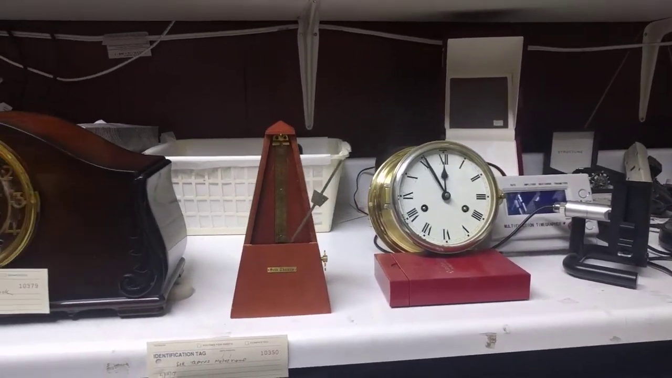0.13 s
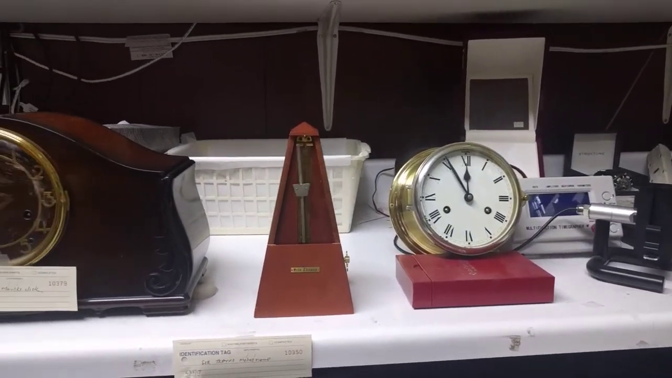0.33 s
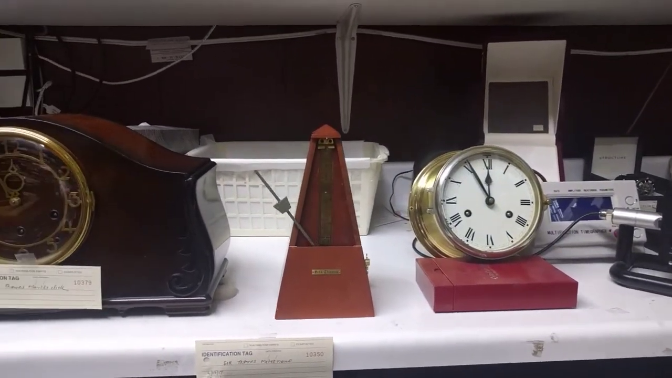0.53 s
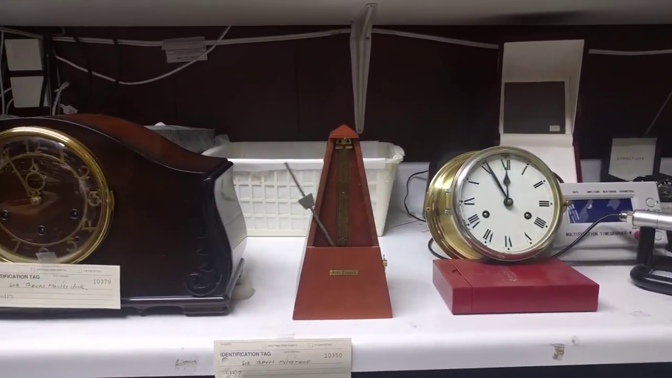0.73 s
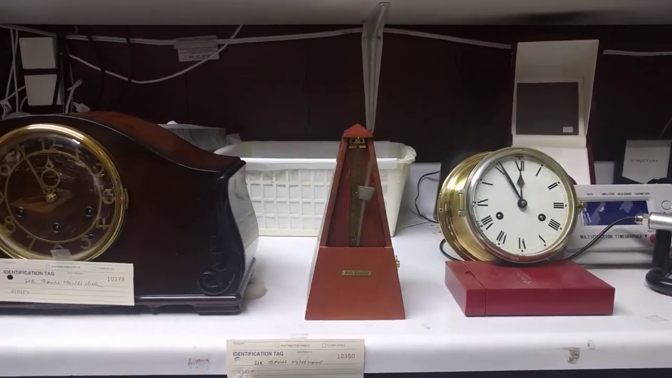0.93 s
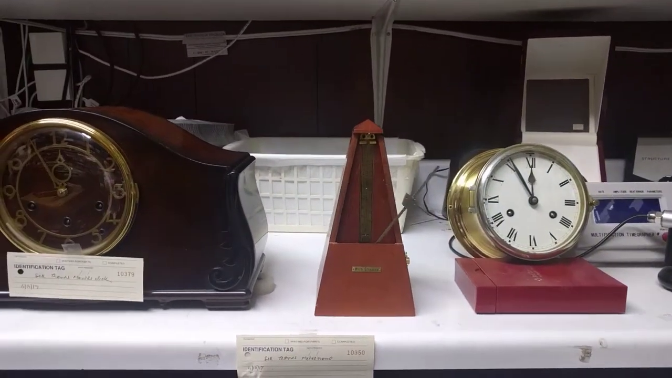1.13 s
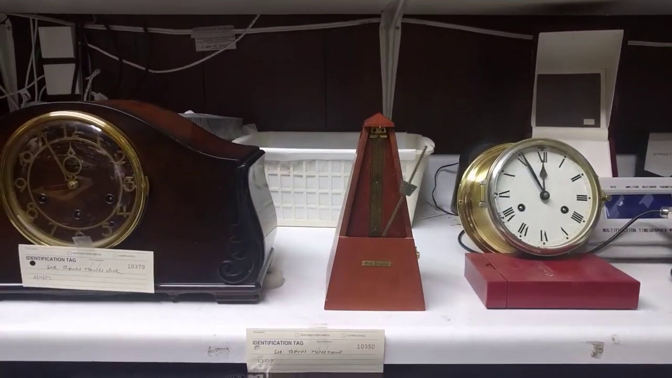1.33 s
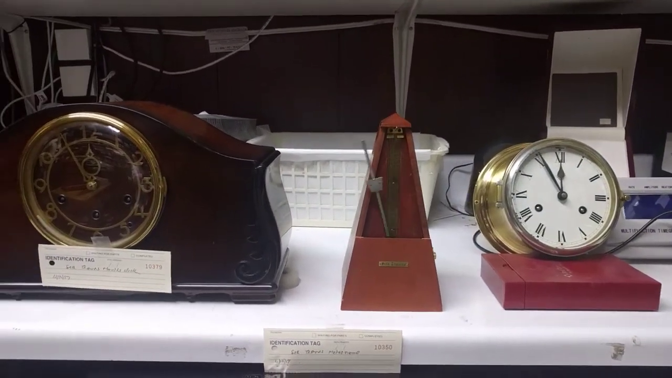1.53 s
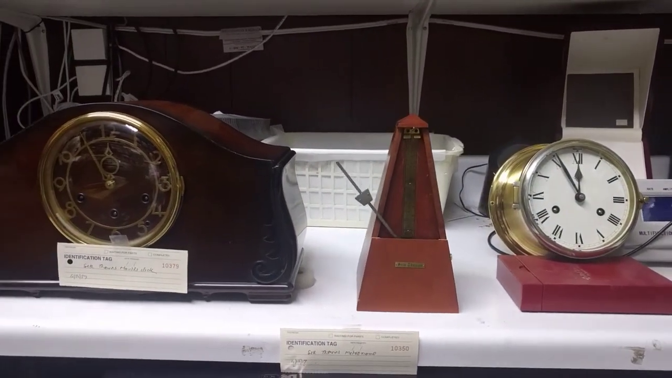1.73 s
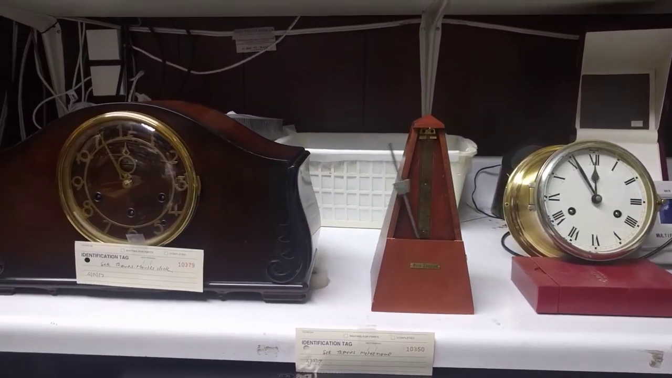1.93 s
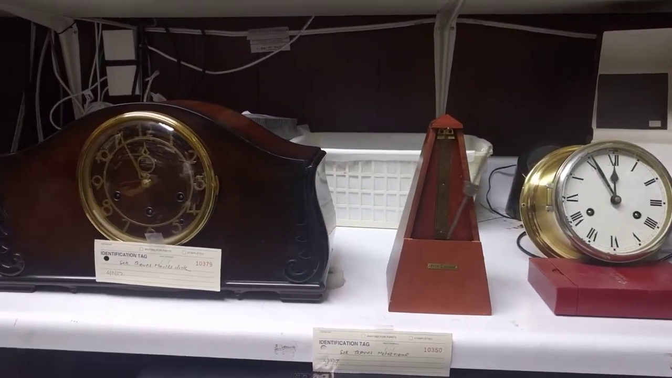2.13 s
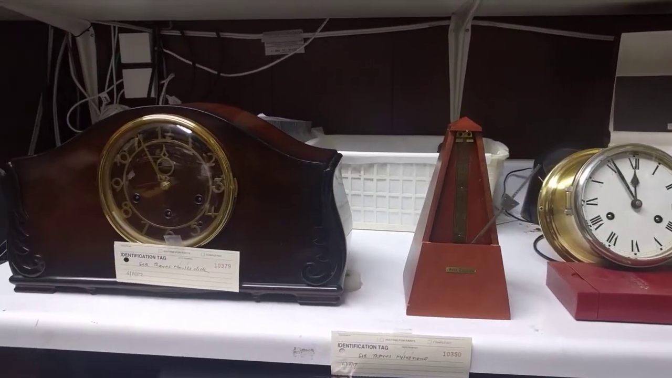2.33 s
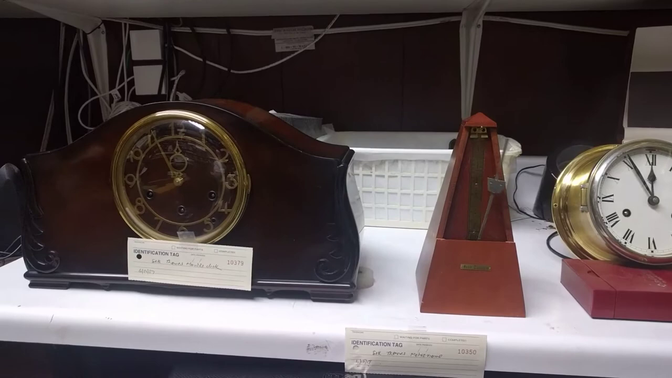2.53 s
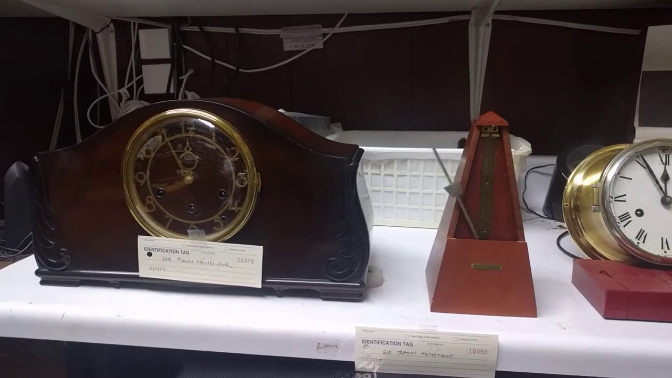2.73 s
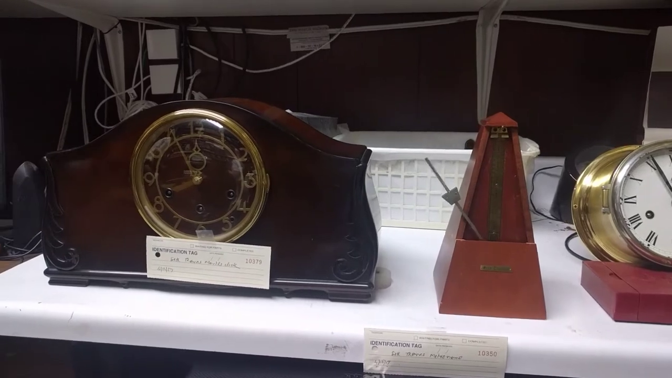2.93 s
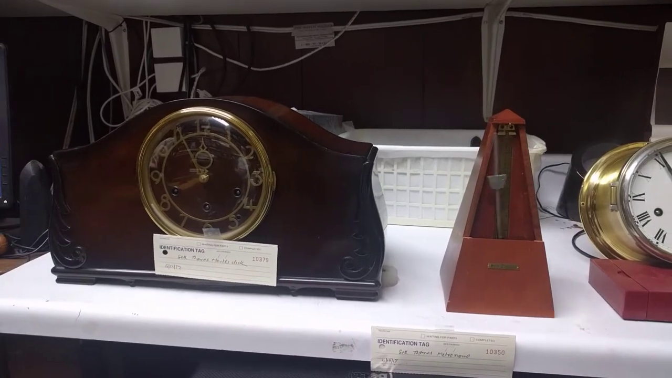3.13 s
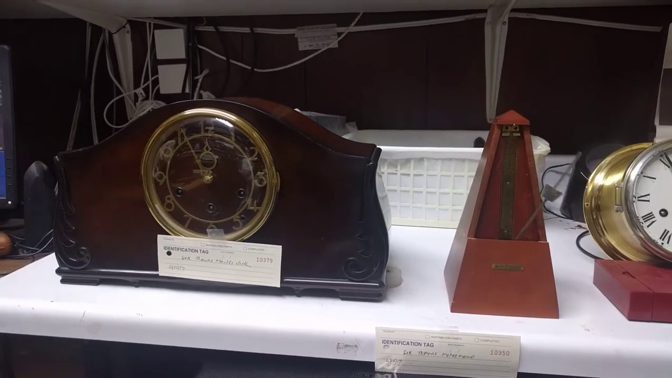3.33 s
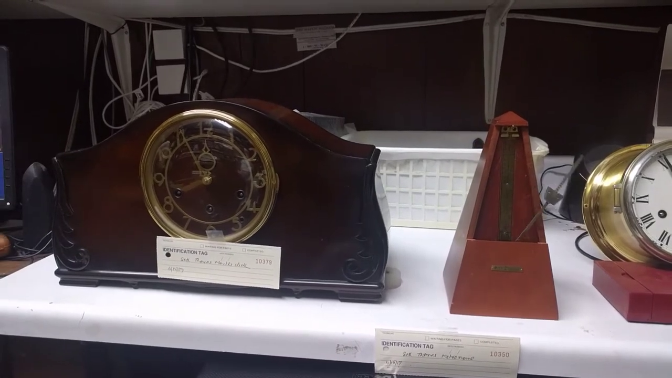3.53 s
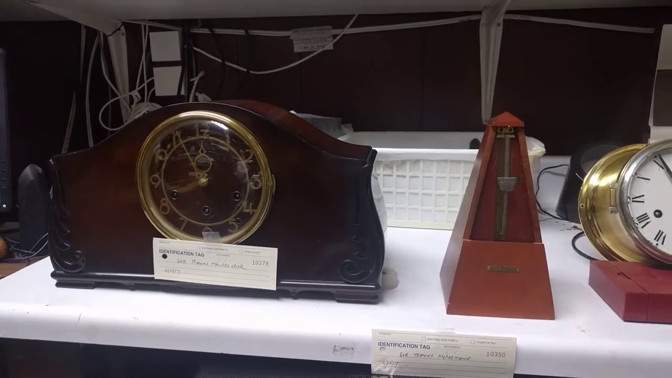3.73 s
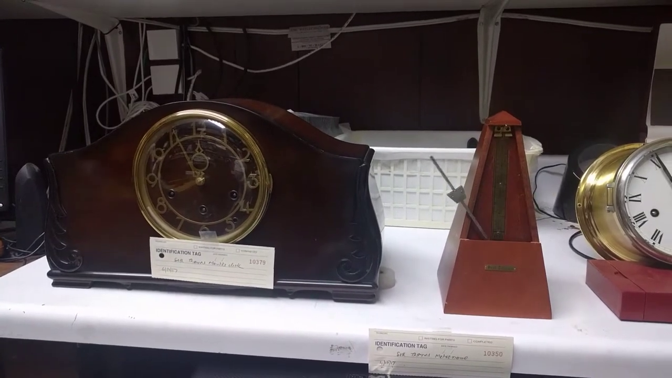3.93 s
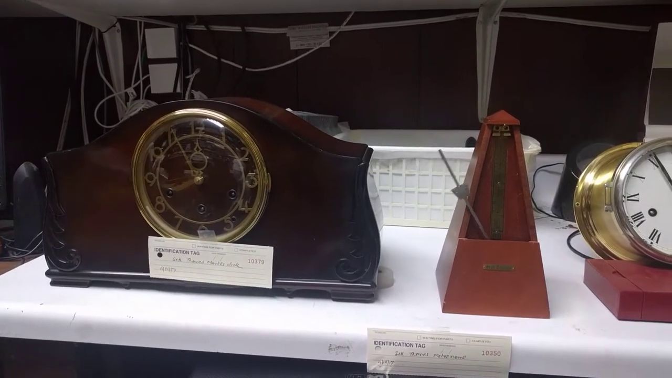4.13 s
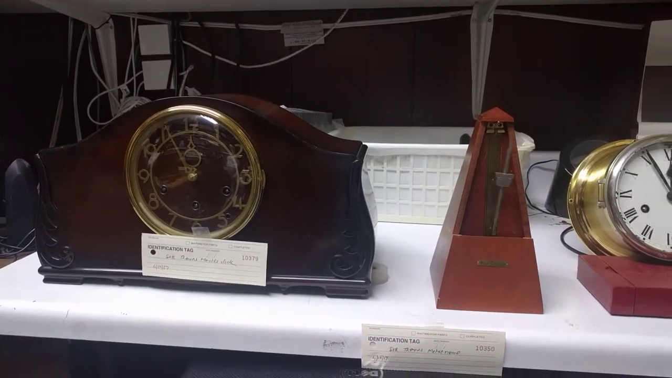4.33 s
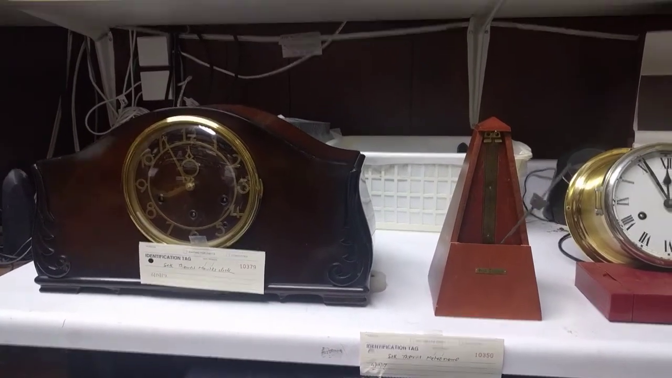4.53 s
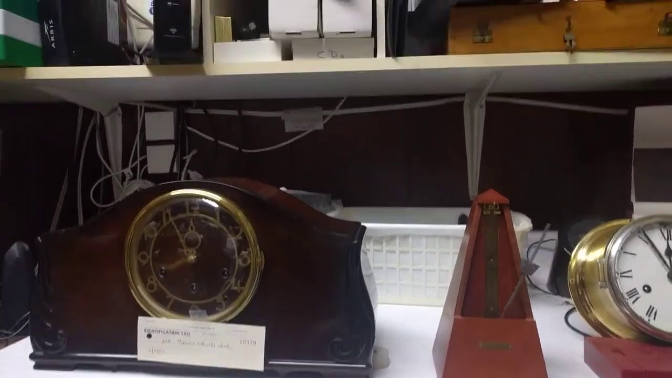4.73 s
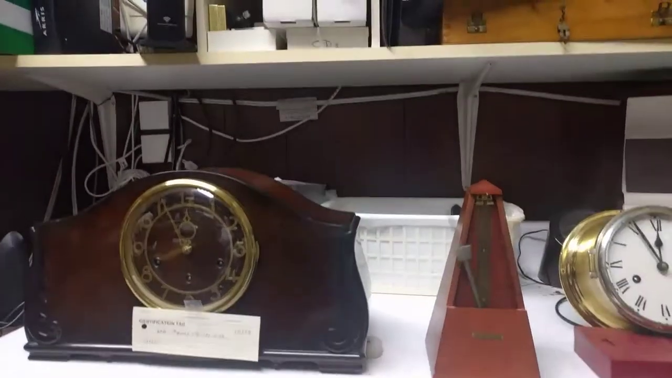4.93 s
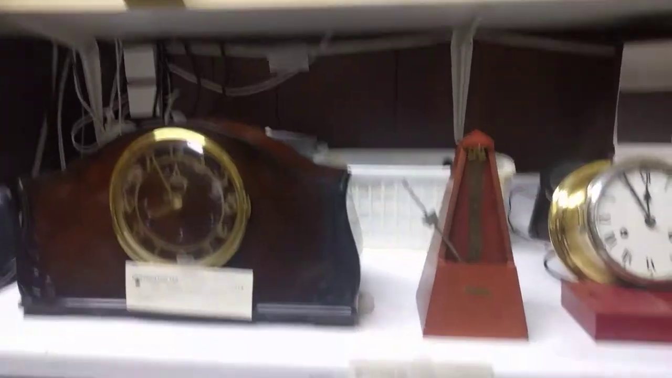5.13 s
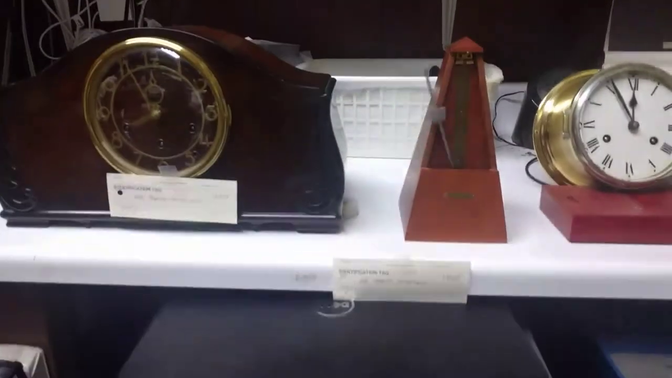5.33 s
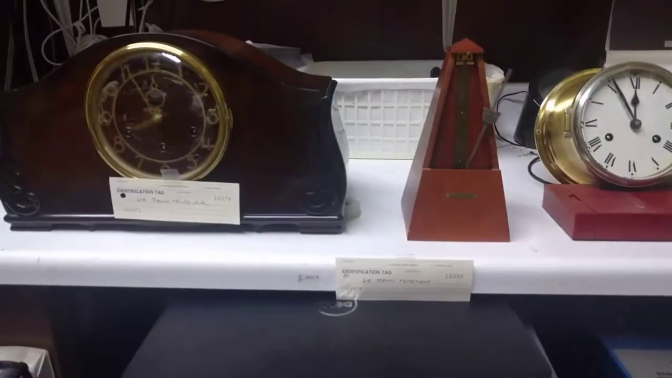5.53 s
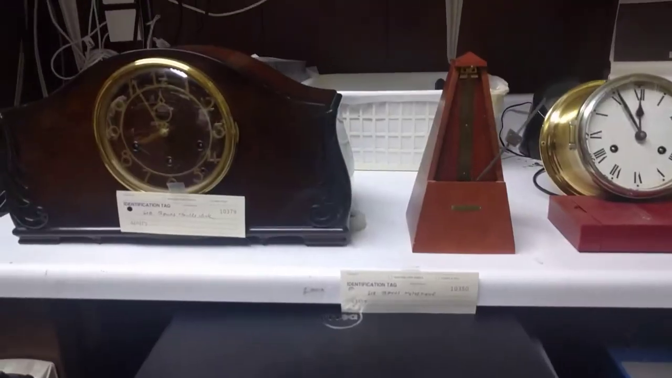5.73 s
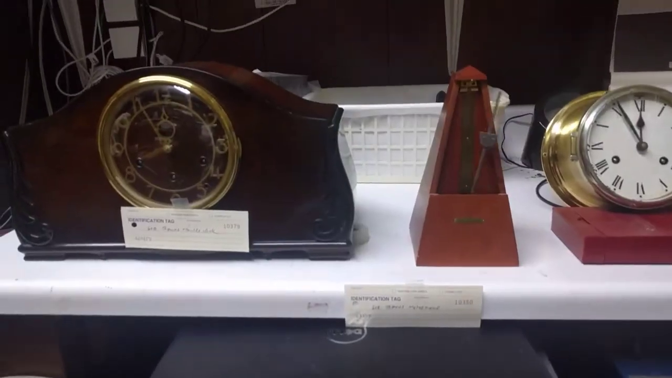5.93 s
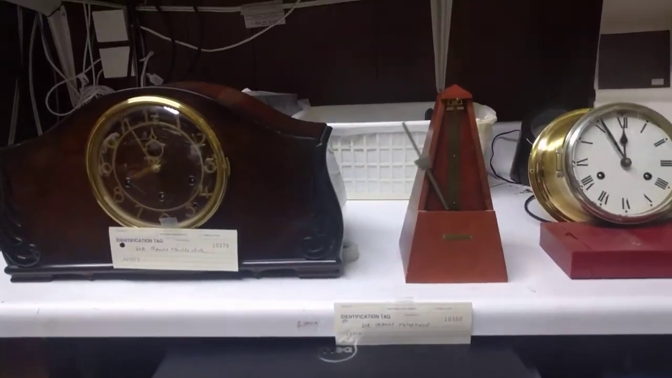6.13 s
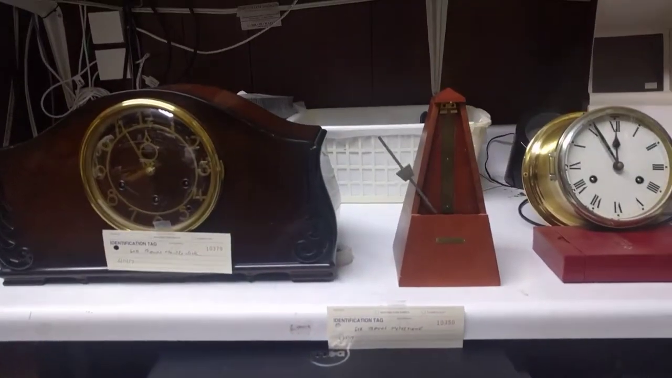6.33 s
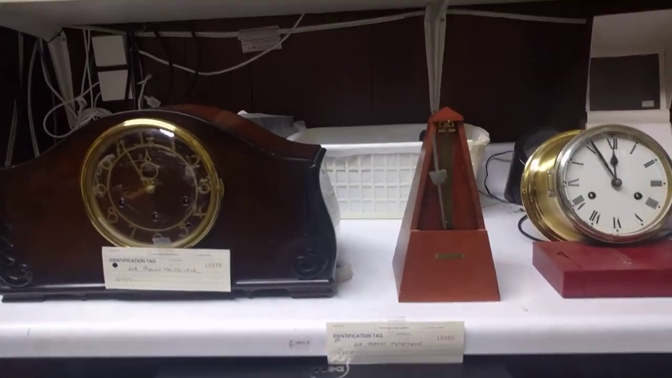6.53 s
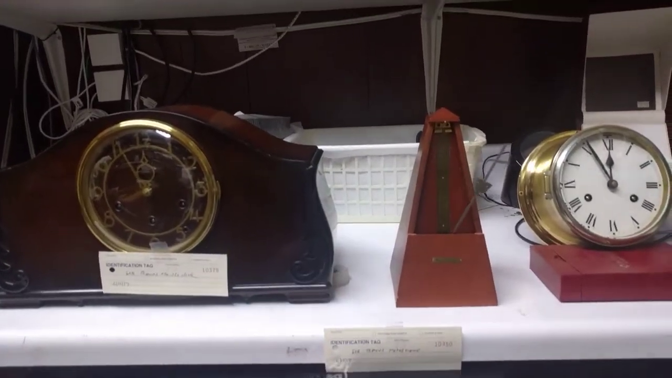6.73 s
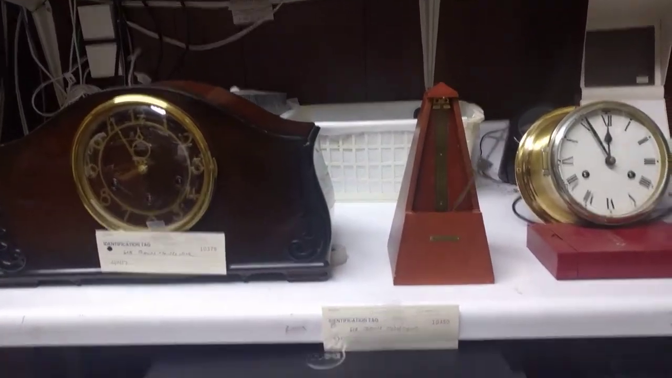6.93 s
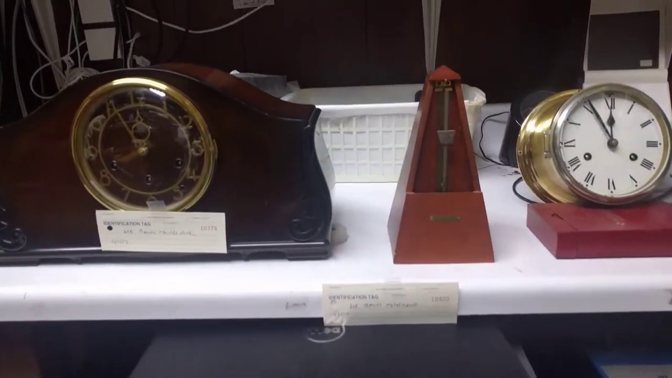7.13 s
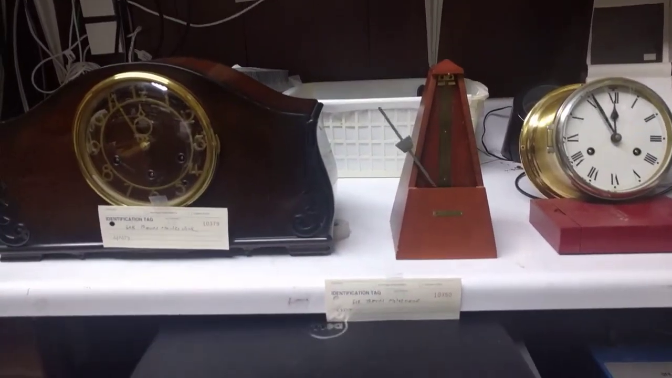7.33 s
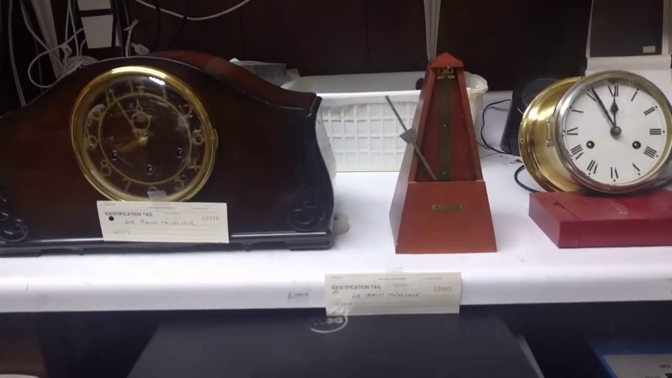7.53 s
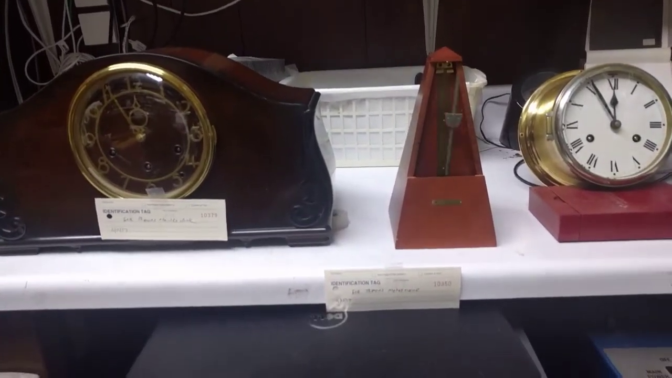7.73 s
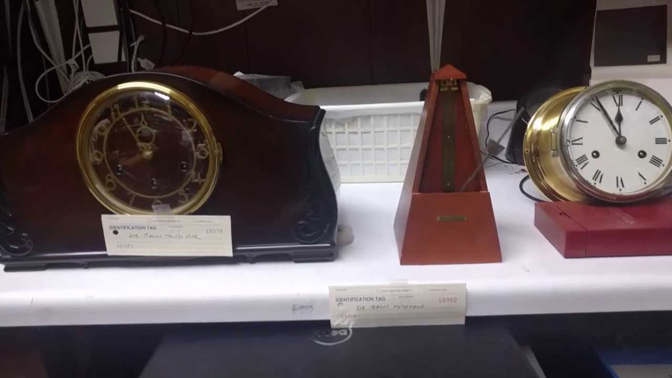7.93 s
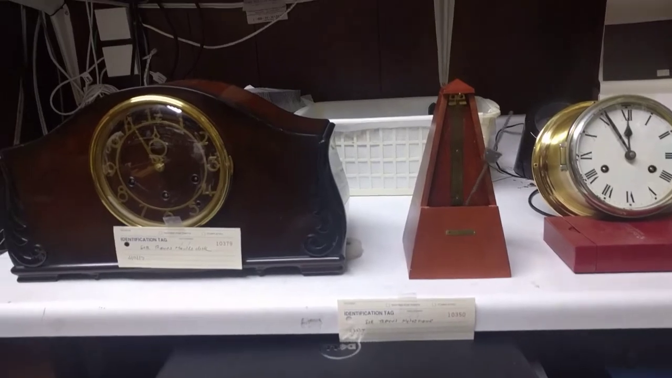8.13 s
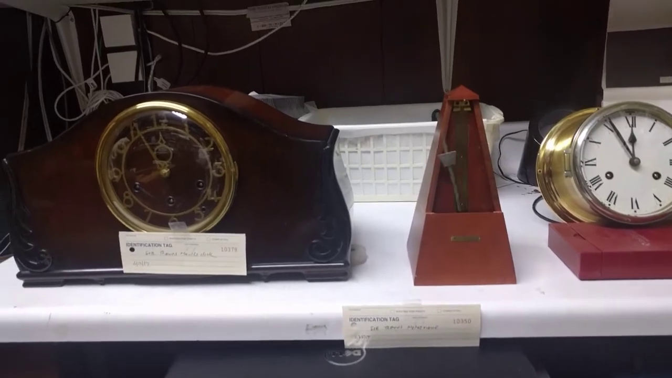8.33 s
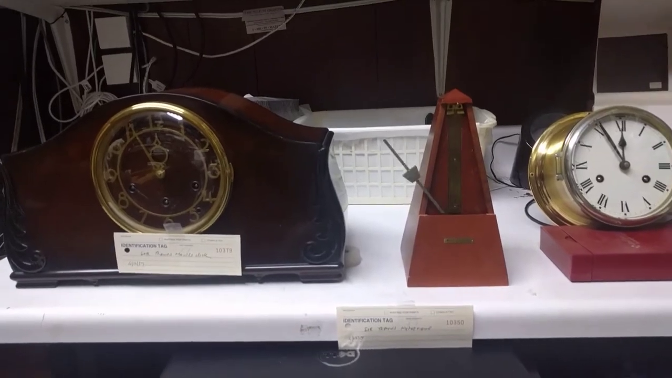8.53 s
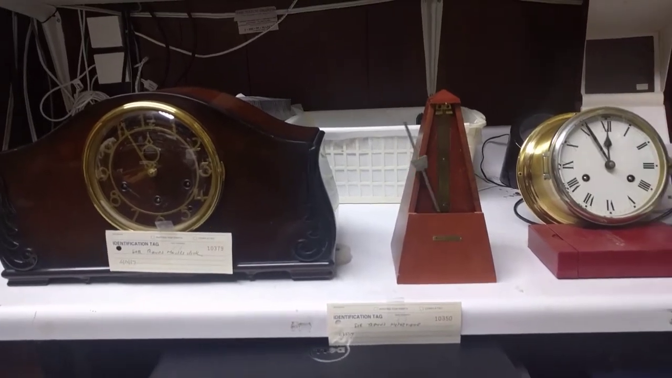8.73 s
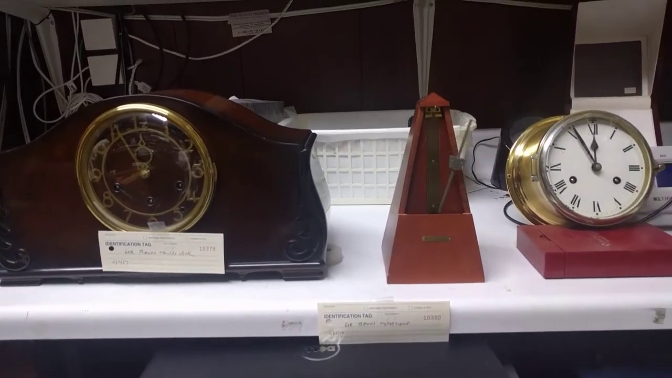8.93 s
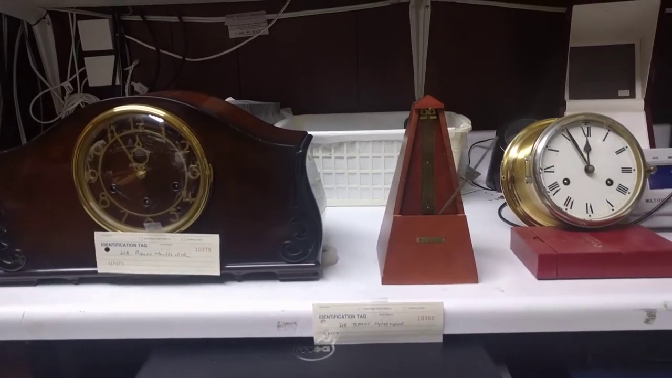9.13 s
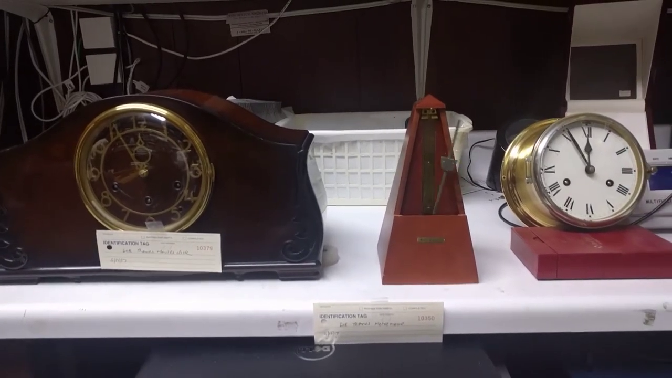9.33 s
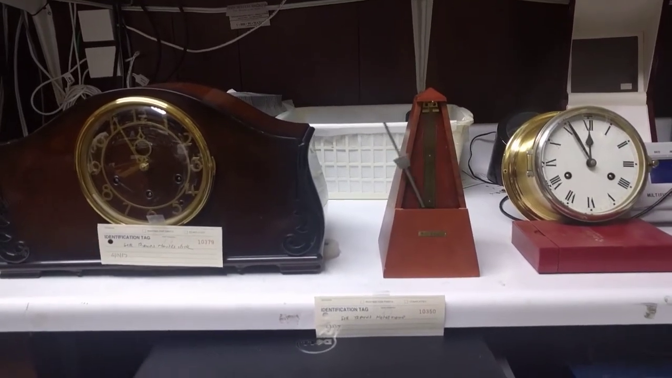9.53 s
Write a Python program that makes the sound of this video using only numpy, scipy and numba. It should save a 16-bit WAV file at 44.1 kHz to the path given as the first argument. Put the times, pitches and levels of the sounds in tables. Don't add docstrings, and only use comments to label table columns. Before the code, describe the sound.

A mechanical metronome in a hollow wooden case beats steadily, nearly twice a second, alternating a crisp bright tick with a slightly different tock. Each beat rings briefly and bounces off the shelf into a small room. A faint low fan hum and soft hiss lie behind. Midway, fingers knock and rub the close hand-held phone microphone, then lighter rustles follow.

```python
import sys
import numpy as np
from scipy import signal
from scipy.fft import rfft, irfft
from scipy.io import wavfile
from scipy.ndimage import uniform_filter1d
from numba import njit

SR = 44100
rng = np.random.default_rng(int(sys.argv[2]) if len(sys.argv) > 2 else 0)


def attenuation_scalar(level_db):
    decades = np.asarray(level_db, float) / 20
    return 10 ** decades


def wav_record(signal):
    frames = np.transpose(np.atleast_2d(signal))
    bounded = np.clip(frames, -1, 1)
    quanta = np.round(bounded * 32767).astype(np.int16)
    wavfile.write(sys.argv[1], SR, quanta)


N = 427329
T = np.arange(N) / SR


def unit(x):
    return x / np.sqrt(np.mean(x ** 2))


def colour(x, points):
    hz, db = np.transpose(points)
    f = np.maximum(np.arange(len(x) // 2 + 1) * SR / len(x), 1)
    gain = attenuation_scalar(np.interp(np.log(f), np.log(hz), db))
    return irfft(rfft(x) * gain, len(x))


@njit
def band(x, hz, width):
    y, b, l = np.empty(len(x)), 0., 0.
    for i in range(len(x)):
        g, k = np.tan(np.pi * hz[i] / SR), width / hz[i]
        v = (b + g * (x[i] - l)) / (1 + g * (g + k))
        b, l, y[i] = 2 * v - b, l + 2 * g * v, k * v
    return y


def ring(x, hz, width):
    return band(x, np.full(len(x), 1. * hz), 1. * width)


@njit
def follow(x, attack, release):
    y, e = np.empty(len(x)), 0.
    for i in range(len(x)):
        e += (abs(x[i]) - e) * (attack if abs(x[i]) > e else release)
        y[i] = e
    return y


def walk(rate):
    hold = int(SR / rate)
    steps = np.repeat(rng.standard_normal(N // hold + 1), hold)
    return uniform_filter1d(uniform_filter1d(steps, hold), hold)[:N]


def strokes(rows, extra_db):
    pointedness = 1.46
    power = np.zeros(N)
    for (s, rise, fall, db, _), more_db in zip(rows, extra_db):
        part = slice(int((s - rise) * SR), int((s + fall) * SR))
        away = (T[part] - s) / np.where(T[part] < s, rise, fall)
        arch = np.maximum(1 - away ** 2, 0) ** pointedness
        power[part] += (attenuation_scalar(db + more_db) * arch) ** 2
    return np.sqrt(power)


# start in seconds, peak level in dB.
BLOWS = [(.4283, -7.5), (1.0187, -5.5), (1.5663, -7), (2.1557, -6.5), (2.7007, -6), (3.2926, -5),
         (3.8376, -6), (4.4268, -6.5), (4.974, -5.5), (5.564, -5), (6.1077, -5.5), (6.6979, -6),
         (7.2445, -5), (7.8363, -5.5), (8.3792, -4.5), (8.9726, -5), (9.5182, -6)]
# pitch in Hz, time to fade by 60 dB in seconds,
# level in a tick in dB, level in a tock in dB.
CASE_MODES = [(516, 0.088, -12, -10.5), (652, 0.045, -3.5, -5.5), (780, 0.048, -3.5, -5.5),
              (745, 0.054, -20, -17), (816, 0.059, -45, -20), (1460, 0.023, -24, -18),
              (2010, 0.014, -24.5, -26), (2777, 0.029, -6.5, -15), (3410, 0.018, -1.5, -7),
              (3790, 0.016, -9, -21), (3660, 0.023, -16, -11.5), (4500, 0.072, -3.5, -10.5),
               (4936, 0.054, 2, -6), (5400, 0.004, 2, 4.5), (5757, 0.024, -0.5, 1.5),
              (6150, 0.0053, 3, 2.5), (6850, 0.04, -6.5, -2), (7180, 0.032, 1.5, -8),
              (7310, 0.013, -19, 1.5), (8050, 0.032, -3, -1), (8470, 0.011, -3.5, -1.5),
              (8900, 0.045, -11, -6), (9810, 0.03, -5, -5.5), (11100, .012, -9, -9),
              (11980, 0.015, -9, -5.5), (14000, .006, -44, -29)]
# delay in seconds, level in dB, signed strength (minus flips the wave).
ECHOES = [
    (.00042, -1, -5),
    (.00105, 6.5, 1.5),
    (.0021, -7, 1.5),
    (.0046, -32, -9),
    (.0093, -15, 2),
]
# frequency in Hz, level in dB per Hz.
TICK_ROOM = [(530, -18), (900, -5), (1730, -14.5), (1920, -10.5), (2840, -6), (4100, -2.5), (4490, 5.5),
             (5650, 0.5), (8540, -0.5), (14000, -46)]
# frequency in Hz, level in dB per Hz.
TOCK_ROOM = [(530, -18), (900, 1), (1130, -15.5), (1460, -5.5), (1640, -12), (3700, -4.5), (6410, 1),
             (8740, 0.5), (9580, -10), (14000, -51)]
# pitch in Hz, width in Hz, tick level in dB, tock level in dB.
PANELS = [
    (780, 89, -13, -21),
    (5600, 270, -7, -4.5),
    (2750, 390, -13.5, -23),
    (3350, 170, -15.5, -36),
    (4800, 150, -9.5, -8),
]


def metronome():
    out, t = np.zeros(N + SR), T[:SR // 3]
    hz, t60, *face_db = np.transpose(CASE_MODES)
    sign = (-1.) ** np.arange(len(hz))
    hollow = hz < 1100
    hollow_db = 1.5

    wall_hz, wall_s, wall_rise_s, wall_fall_s, wall_db = 773, 0.033, 0.0075, 0.0094, -33.5
    swell = np.exp(-((t - wall_s) / np.where(t < wall_s, wall_rise_s, wall_fall_s)) ** 2)
    wall = attenuation_scalar(wall_db) * swell * np.sin(2 * np.pi * wall_hz * t)

    room_db, room_t60_s, room_rise_s, room_end_s = -19, 0.16, 0.00027, 0.27
    chance = rng.standard_normal((len(BLOWS), 2, len(hz)))
    for k, (s, db) in enumerate(BLOWS):
        face = k % 2
        size = sign * attenuation_scalar(face_db[face] + 1.2 * chance[k, 0])
        pitch = hz * (1 + 0.0026 * chance[k, 1])
        fade = np.exp(-np.log(1000) * t / t60[:, None])
        modes = fade * np.sin(2 * np.pi * pitch[:, None] * t)

        case = (size * ~hollow) @ modes
        near = case.copy()
        for late, echo_db, turn in ECHOES:
            near += turn * attenuation_scalar(echo_db) * np.interp(t - late, t, case, left=0)
        near += (attenuation_scalar(face_db[face] + hollow_db) * hollow) @ modes
        near = np.convolve(near, np.hanning(6), "same")
        near /= near[:SR // 50].std()

        room = unit(colour(rng.standard_normal(len(t)), (TICK_ROOM, TOCK_ROOM)[face]))
        for panel_hz, width, *panel_db in PANELS:
            room += attenuation_scalar(panel_db[face]) * unit(ring(rng.standard_normal(len(t)), panel_hz, width))
        room /= np.sqrt(1 + (t / room_end_s) ** 6)
        room *= (1 - np.exp(-t / room_rise_s)) * np.exp(-np.log(1000) * t / room_t60_s)

        i = int(s * SR)
        out[i:i + len(t)] += attenuation_scalar(db + 4.0) * (attenuation_scalar(-14.5) * near + attenuation_scalar(room_db) * room + wall)
    return signal.sosfilt(signal.butter(4, 420, "high", fs=SR, output="sos"), out[:N])


# firmest moment in seconds, press time in seconds,
# release time in seconds, peak level in dB, lightness of touch in dB.
RUBS = [(1.706, 0.037, .1, -42.5, -10), (2.02, 0.009, 0.048, -38.5, -13), (2.063, .01, 0.075, -36.5, -11),
        (4.54, 0.028, .015, -39.5, -5), (4.558, 0.0078, 0.024, -17, -1), (4.64, 0.098, 0.12, -18, -2),
        (4.765, 0.056, 0.028, -34.5, -8), (5.052, .025, 0.013, -33.5, 7), (5.11, 0.052, .04, -42, 5),
        (5.171, 0.061, 0.047, -34.5, 2), (5.22, .006, 0.048, -37.5, -2), (5.299, .007, 0.027, -32.5, -2),
        (5.327, .03, 0.035, -28, -4.5), (5.434, .03, 0.045, -41.5, 4), (5.728, .025, .015, -44, 2),
        (5.79, .035, 0.14, -44.5, 8), (6.205, .018, 0.049, -42.5, 9), (6.294, .025, 0.061, -44, 5),
        (6.39, 0.058, 0.048, -37.5, 6), (6.448, 0.012, 0.031, -32.5, -7), (6.525, 0.038, 0.14, -25, -1.5),
        (6.92, 0.042, 0.027, -43.5, 19), (7.19, .09, 0.079, -52, 15), (7.3, .012, 0.11, -47, 11)]
# frequency in Hz, level in dB per Hz.
SKIN = [(1650, -54), (2800, -22.5), (3590, -5.5), (4710, 3.5), (5590, 6), (6800, -2), (8070, -1.5),
        (8560, -1), (9800, -14.5), (11500, -27), (15000, -56), (22000, -120)]
# start in seconds, peak level in dB, pitch in Hz, width in Hz.
SNAPS = [
    (4.5512, -1.5, 1700, 1300),
    (2.061, -16, 4500, 5000),
    (5.216, -25, 4000, 5000),
    (5.296, -24, 4500, 4000),
    (5.627, -22, 8000, 3000),
    (6.201, -30, 400, 500),
]
# peak time in seconds, rise in seconds, fall in seconds, peak level in dB, pitch in Hz.
JOLTS = [
    (3.59, .06, .06, -58, 50),
    (7.22, .055, .07, -54, 45),
    (7.34, .05, .09, -60.5, 45),
    (8.81, .016, 0.036, -35, 115),
    (8.855, 0.029, .035, -34.5, 90),
    (8.885, 0.033, 0.025, -40, 70),
    (8.91, 0.025, 0.027, -40, 107),
]


def fingers():
    light_db = np.transpose(RUBS)[-1]
    grain_db = 1.5 * rng.exponential(size=N) + 1.6 * walk(150)
    slips = rng.standard_normal((3, N)) * attenuation_scalar(grain_db)
    shell = colour(slips[0], SKIN)
    dull = ring(ring(slips[1], 2040, 1860), 2040, 1860)
    bright = ring(slips[2], 7300, 6000)
    out = strokes(RUBS, 0 * light_db) * unit(shell)
    out += strokes(RUBS, -11.5 - 0.57 * light_db) * unit(dull)
    out += strokes(RUBS, -16.5 + light_db) * unit(bright)

    for s, db, hz, width in SNAPS:
        i = int(s * SR)
        push = np.exp(-((T[:800] * hz - .5) / 0.15) ** 2)
        snap = ring(push, hz, width) + 0.17 * push
        click = 1. * (push == push.max())
        snap += 2.8 * ring(ring(click, 5800, 1200), 5300, 3000)
        out[i:i + 800] += attenuation_scalar(db) * snap / np.abs(snap).max()

    jolt_s, *_, hz = np.transpose(JOLTS)
    jolt_hz = np.interp(T, jolt_s, hz)
    thud = band(band(rng.standard_normal(N), jolt_hz, 58.0), jolt_hz, 74.0)
    return out + strokes(JOLTS, 0 * hz) * unit(thud)


# pitch in Hz, width of its wavering in Hz, rms level in dB.
FAN_HUM = [
    (74.2, 1.69, -55),
    (145.4, 7.32, -64.5),
    (220.6, 4.04, -61.5),
]
# frequency in Hz, level in dB per Hz.
AIR = [(20, -24), (42, -23.5), (55, -5), (105, -14), (140, -6), (300, -7), (345, -12.5), (480, -7),
       (850, -12.5), (2100, -13), (2600, -16.5), (5550, -10), (8600, -16), (15500, -48.5)]


def fan():
    air = unit(colour(rng.standard_normal(N), AIR)) * attenuation_scalar(-43.5 + 0.38 * walk(3.56))
    air += attenuation_scalar(-59) * unit(ring(air, 5600, 370))
    for hz, width, db in FAN_HUM:
        turns = np.cumsum(hz + 0.391 * width * walk(2.5)) / SR
        level = np.sqrt(2) * attenuation_scalar(db + 0.1 * width * walk(4.09))
        air += level * np.sin(2 * np.pi * turns)
    return air


def scene():
    return np.tile(metronome() + fingers() + fan(), (2, 1))


def band_limit(x):
    return signal.sosfilt(signal.butter(12, 16540, fs=SR, output="sos"), x)


def record(dry):
    knee_db, ratio, attack_s, release_s = -30, 1.754, 0.0021, 0.014
    level = follow(dry[0], 1 / (attack_s * SR), 1 / (release_s * SR))
    level = uniform_filter1d(level, size=130)
    gain = np.minimum(attenuation_scalar(knee_db) / (level + 1e-9), 1) ** (1 - 1 / ratio)
    hiss = attenuation_scalar(-69) * unit(ring(rng.standard_normal(N), 12000, 8000))
    top_filter = signal.ellip(8, .3, 50, 15900, fs=SR, output="sos")
    heard = signal.sosfilt(top_filter, dry * gain + hiss)
    return band_limit(heard - .0009)


dry = scene()
out = record(dry)
wav_record(out)
```